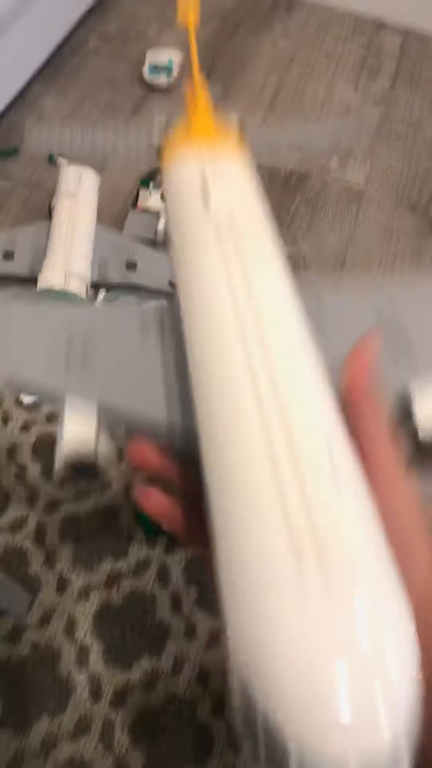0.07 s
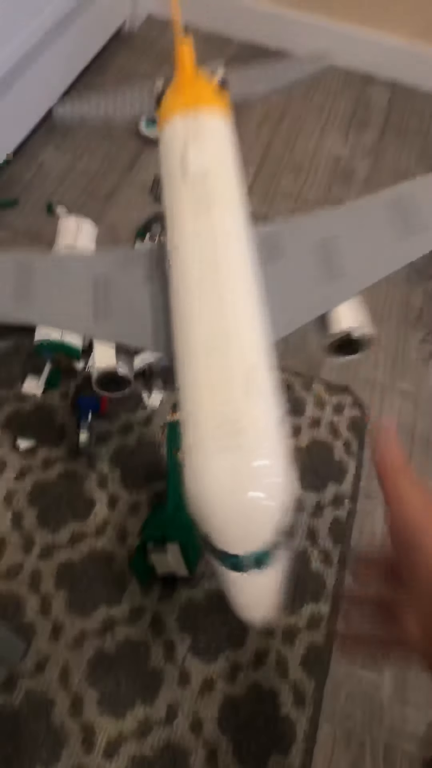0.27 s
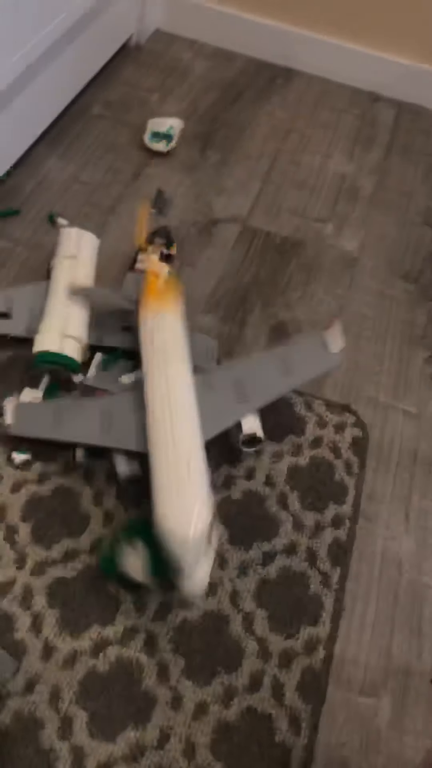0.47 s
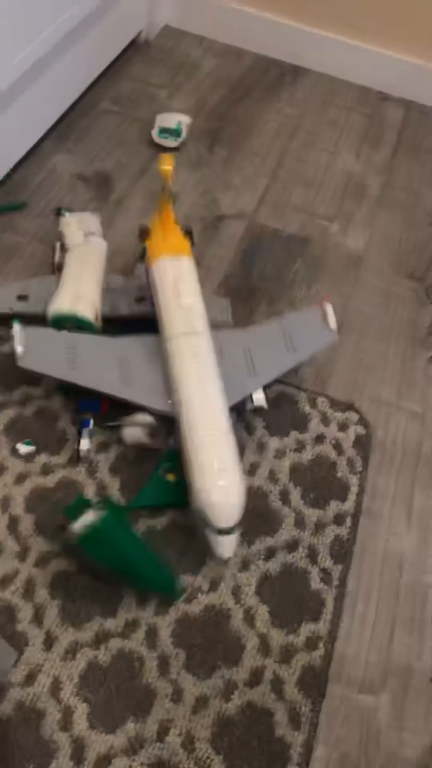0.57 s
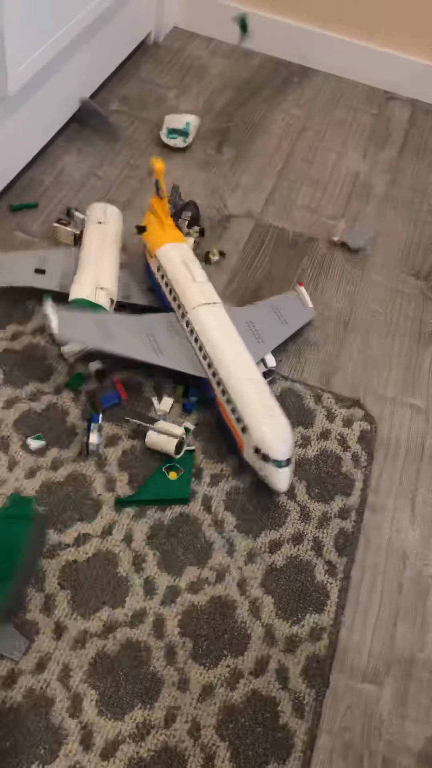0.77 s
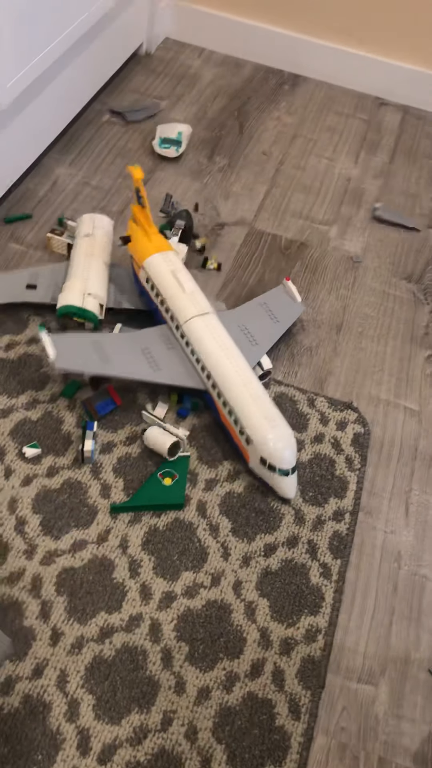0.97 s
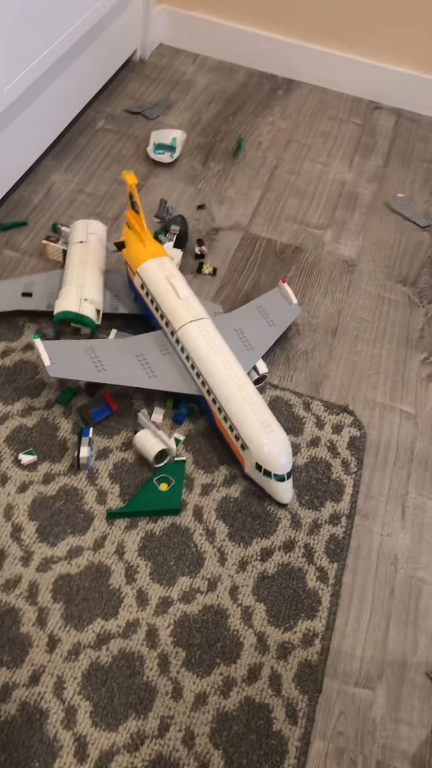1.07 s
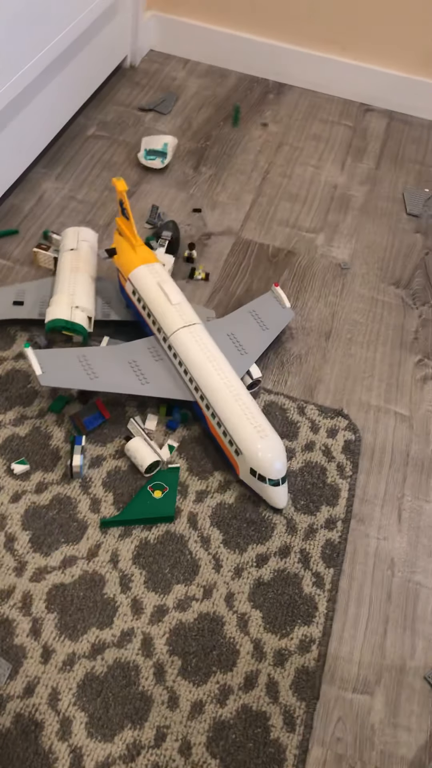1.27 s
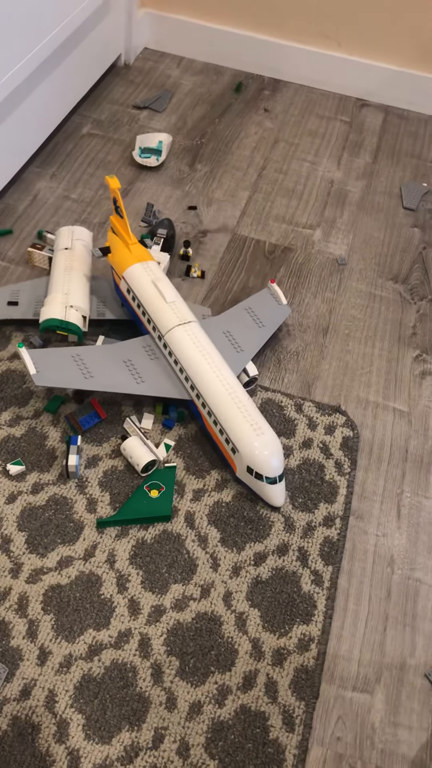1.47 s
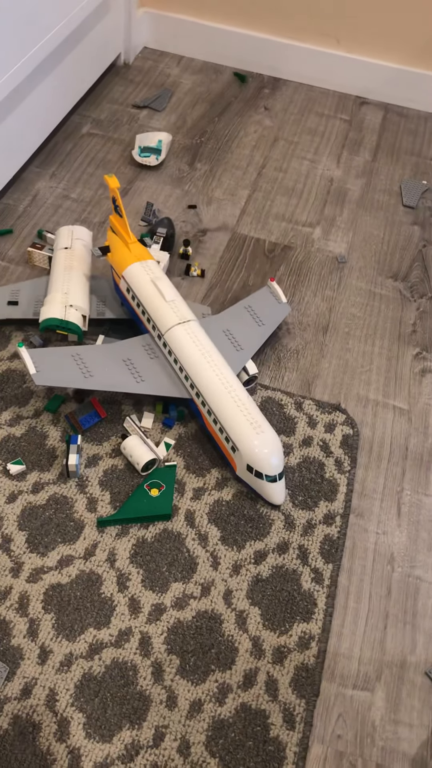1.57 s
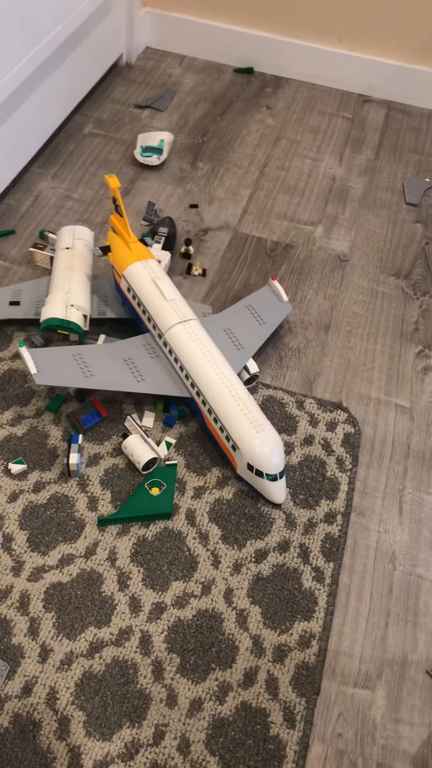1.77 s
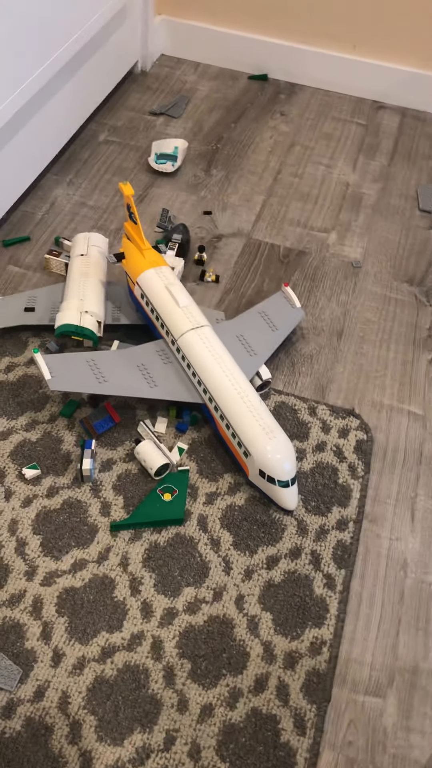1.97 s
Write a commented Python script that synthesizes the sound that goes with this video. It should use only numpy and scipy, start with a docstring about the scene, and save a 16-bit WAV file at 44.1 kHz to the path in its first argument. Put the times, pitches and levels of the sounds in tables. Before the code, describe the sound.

A large plastic brick toy airplane crashes on a plank floor in a small, slightly echoing room. A soft bump and squeaky hand rub run from 0 to 0.4 seconds. At 0.44 the hollow hull cracks loudly, the floor booms, and bricks clatter until about 1.0. A flat plate smacks down at 1.03, bouncing faster beside high tinkles until 1.7; faint dull bumps end it over quiet air.

```python
"""First, quiet room air and a dull bump; then a big toy airplane of plastic bricks rubs and squeaks out of a hand.
It crashes on a plank floor: the hull cracks, the floor booms and loose bricks clatter away.
A flat plate lands hard and bounces to rest beside a small tinkling piece.
Plastic hits are bursts of noise plus ringing sines, the floor is low sines and a knock, the air is filtered noise.
All but the air also echo in a small room."""
import sys
import numpy as np
from scipy import signal
from scipy.io import wavfile

SR = 44100
rng = np.random.default_rng(int(sys.argv[2]) if len(sys.argv) > 2 else 0)


def unload_audio(sound):
    """Save the sound as a 16-bit wav file, at the path given as the first command line argument."""
    columns = np.transpose(np.atleast_2d(sound))
    # keep every value between -1 and 1, then stretch to whole-number steps
    steps = np.round(np.clip(columns, -1, 1) * 32767)
    wavfile.write(sys.argv[1], SR, steps.astype(np.int16))


N = 89302  # length in samples
RING = np.arange(SR // 2) / SR  # time within one hit: half a second


def amp(db):
    """Turns decibels into a gain."""
    return 10 ** (np.asarray(db) / 20)


def unit(x):
    """Scales a sound to energy 1."""
    return x / np.sqrt(np.sum(x ** 2) + 1e-20)


def read(points, hz):
    """Reads between the points of a table, along a log-frequency axis."""
    f, value = np.transpose(points)
    return np.interp(np.log(hz + 1), np.log(f + 1), value)


def add(mix, s, sound):
    """Mixes a sound in at time s [s], cutting what runs past the end."""
    part = mix[round(s * SR):][:len(sound)]
    part += sound[:len(part)]


def colour(x, points, size=2048):
    """Filters a sound to a given spectrum without smearing it back in time (minimum phase)."""
    hz = abs(np.fft.fftfreq(size, 1 / SR))
    log_gain = np.log(amp(read(points, hz)))
    # the Hilbert transform finds the phase that puts the response after time 0
    response = np.exp(np.conj(signal.hilbert(log_gain)))
    taps = np.fft.ifft(response).real
    return signal.fftconvolve(x, taps)[:len(x)]


def dying(t60):
    """A fade that falls 60 dB in t60 seconds."""
    return np.exp(-np.log(1000) * RING / np.maximum(t60, 1e-3))


def ring(modes, detune):
    """A struck object rings at its own pitches, here with random detuning and starting phase."""
    total = np.zeros(len(RING))
    for hz, db, t60 in modes:
        pitch = hz * (1 + detune * rng.normal())
        wave = np.sin(2 * np.pi * (pitch * RING + rng.random()))
        total += amp(db) * dying(t60) * wave
    return unit(total)


def crack(t60, grain_db):
    """A dying burst of noise, made uneven like many tiny contacts."""
    # each random level lasts 20 samples
    grain = np.repeat(rng.standard_normal(len(RING)), 20)[:len(RING)]
    noise = rng.standard_normal(len(RING))
    return unit(noise * amp(grain_db * grain) * dying(t60))


# where a hit's body, crack, fizz and topmost treble levels apply: (frequency [Hz])
BAND_HZ = [1100, 4600, 11500, 15000]


def strikes(rows, modes, spectrum, level_db, ring_db, detune, grain_db):
    """Plastic hits: a crack plus ringing pitches, each hit with its own brightness."""
    out = np.zeros(N)
    for s, *band_db, t60 in rows:
        hit = crack(t60, grain_db) + amp(ring_db) * ring(modes, detune)
        brightness = list(zip(BAND_HZ, band_db))
        add(out, s, colour(hit, brightness))
    return amp(level_db) * colour(out, spectrum)


# Hit and mode levels below are relative: each layer sets its own loudness.

# spectrum of the quiet room air: (frequency [Hz], relative level [dB])
AIR_COLOUR = [(20, -29), (38, -13.5), (55, -4.5), (150, -8), (300, -12.5), (1200, -20), (3000, -24.5),
              (8000, -32.5), (16000, -43.5)]


def room_air(level_db=-62.5):
    """Steady noise, mostly low, with the given average (RMS) level."""
    noise = colour(rng.standard_normal(N), AIR_COLOUR)
    return amp(level_db) * np.sqrt(N) * unit(noise)


# dull handling bumps: (time [s], body level [dB], crack level [dB], fizz level [dB], crack t60 [s])
BUMPS = [(.001, -57.5, -80, -90, 0.089), (.378, -55, -84.5, -99, 0.077), (1.816, -49, -68, -85, 0.043),
         (1.895, -55.5, -62.5, -98, 0.13), (2.016, -43.5, -77, -82.5, 0.057)]
# spectrum of the bumps: (frequency [Hz], relative level [dB])
BUMP_COLOUR = [(40, -9), (160, 1.5), (300, 7.5), (700, 5.5), (1300, -0.5), (3000, -9.5), (16000, -15.5)]
# ringing pitches of the hollow hull: (frequency [Hz], level [dB], t60 [s])
HULL_MODES = [(603, -4.5, 0.17), (768.4, -8, 0.11), (891.4, -0.5, 0.058), (990, -1.5, 0.088),
              (1120, 0.5, 0.056), (1473, -3.5, 0.046), (1685, -2, 0.077), (1930, -2.5, 0.047),
              (2086, -4.5, .06), (2680, 0.5, 0.054)]


def handling_bumps():
    """Dull bumps ring the hull's pitches under mostly low noise."""
    return strikes(BUMPS, HULL_MODES, BUMP_COLOUR, level_db=28.5, ring_db=-18, detune=.01, grain_db=-0.5)


# the hull catching on the hand: (time [s], rub level [dB], squeak level [dB])
SLIPS = [(.092, -46.5, -67), (.108, -49.5, -67.5), (.139, -46.5, -65.5), (.159, -43.5, -61.5),
         (.164, -42.5, -59), (0.194, -48, -66), (.209, -45.5, -52.5), (0.233, -49.5, -57),
         (0.252, -48.5, -56), (.280, -51, -61.5), (.304, -54.5, -65), (.327, -57.5, -49),
         (0.356, -60.5, -51.5), (0.417, -54, -54.5)]
# spectrum of the rubbing: (frequency [Hz], relative level [dB])
RUB_COLOUR = [(100, -32.5), (450, -15.5), (950, 1.5), (1300, 0), (2100, -14.5), (3100, -13), (4100, -14.5),
              (5000, -28.5), (6700, -18.5), (7500, -33), (16000, -35.5)]
# pitches of the squeak: (frequency [Hz], level [dB], t60 [s])
SQUEAK_MODES = [(3320, 0, .05), (3400, -1, .05), (6350, -15, .04), (6780, -13, .05)]


def hand_rub(level_db=22, squeak_level_db=20, slip_t60=.05):
    """The hull slips over the fingers: each catch is a noise burst plus a ringing squeak."""
    out = np.zeros(N)
    for s, rub_db, squeak_db in SLIPS:
        rub = unit(colour(crack(slip_t60, 2), RUB_COLOUR))
        squeak = ring(SQUEAK_MODES, detune=.005)
        add(out, s, amp(rub_db + level_db) * rub + amp(squeak_db + squeak_level_db) * squeak)
    return out


# blows of the hull: (time [s], body level [dB], crack level [dB], fizz level [dB], crack t60 [s])
BLOWS = [(.4368, -13, -9.5, -17, .037), (.4475, -10.5, -21.5, -33, .045), (.473, -21.5, -10, -12, .035),
         (.484, -11, -13, -19, .05), (.490, -19.5, -15.5, -21.5, .03), (.496, -21, -18, -24.5, .06),
         (.513, -24.5, -24, -21.5, .05), (.550, -31, -19, -24, .045), (.590, -24, -21, -27, .05),
         (.598, -31.5, -22.5, -27, .045), (.622, -28, -22.5, -31, .034), (.6725, -17.5, -21, -29, .03),
         (.686, -26.5, -30, -29, .02), (.696, -24.5, -20.5, -25.5, .025), (.7672, -32.5, -26, -32.5, .022),
         (.808, -25, -21, -22, .035), (.812, -26.5, -21, -29, .04), (.821, -31.5, -26, -26.5, .04)]
# spectrum of the hull's contacts: (frequency [Hz], relative level [dB])
HULL_COLOUR = [(25, -29), (100, -6), (250, 3), (430, 1.5), (800, 6.5), (1500, 9.5), (3000, 4.5), (7000, 2),
               (9500, 1), (11000, -1), (16000, -5.5)]


def hull_crash():
    """The hollow hull cracks apart in a run of blows that ring its middle pitches."""
    return strikes(BLOWS, HULL_MODES, HULL_COLOUR, level_db=27, ring_db=-15.5, detune=0.0012, grain_db=1.0)


# weight landing on the floor: (time [s], deep boom level [dB], plank thud level [dB], knock level [dB])
THUMPS = [(.439, -14, -5.5, -10), (.484, -4, -9.5, -15), (0.513, -4, -12.5, -24),
          (.592, -17.5, -10.5, -25.5), (0.691, -50, -20, -19), (0.721, -35, -34, -24.5),
          (0.811, -38.5, -26, -27.5), (0.901, -35, -53.5, -28.5), (.95, -35.5, -42.5, -39),
          (1.01, -27, -35, -29), (1.165, -62, -38, -34.5), (1.272, -40, -37, -36.5),
          (1.43, -54, -47, -43.5), (1.539, -56, -52, -44), (1.681, -48, -57, -63.5),
          (1.89, -48.5, -59.5, -69.5)]
# low pitches of the floor: (frequency [Hz], level [dB], t60 [s])
FLOOR_MODES = [(56.3, -5.5, 0.39), (61, -0.5, 0.27), (88.1, 2, 0.28), (105.1, 2, 0.3), (121.4, -1.5, 0.27),
               (132.4, -3, .12), (200.5, -9.5, 0.15)]
BOOM_HZ, THUD_HZ = 62, 99.8  # where the boom and thud levels apply


def floor_boom(level_db=-10, knock_level_db=18, knock_t60=0.24, knock_hz=380, rise_s=0.002):
    """The planks swell into a boom and knock under each landing."""
    out = np.zeros(N)
    knock_band = signal.butter(2, [110, knock_hz], "band", fs=SR, output="sos")
    swell = 1 - np.exp(-RING / rise_s)
    for s, boom_db, thud_db, knock_db in THUMPS:
        boom = np.zeros(len(RING))
        for hz, db, t60 in FLOOR_MODES:
            landing_db = np.interp(hz, [BOOM_HZ, THUD_HZ], [boom_db, thud_db])
            boom += amp(db + landing_db) * dying(t60) * np.sin(2 * np.pi * hz * RING)
        knock = unit(signal.sosfilt(knock_band, crack(knock_t60, 0)))
        add(out, s, amp(level_db) * boom * swell + amp(knock_db + knock_level_db) * knock)
    return signal.sosfilt(signal.butter(3, 40, "high", fs=SR, output="sos"), out)


# ringing pitches of small bricks: (frequency [Hz], level [dB], t60 [s])
BRICK_MODES = [(3315, -5, 0.18), (4060, -1.5, 0.02), (6006, 2, 0.087), (8220, -11.5, 0.015),
               (12800, -5, .025), (13250, 0, .025)]
# spectrum of the tumbling small bricks: (frequency [Hz], relative level [dB])
SCATTER_COLOUR = [(100, -2), (400, 14), (1000, 22), (2000, 20.5), (4000, 19), (8000, 12.5), (15000, 5.5)]
SCATTER_S, SETTLED_S = 0.44, 1.72  # start and end of the tumbling [s]
SCATTER_DB, SCATTER_FALL_DB_PER_S = -26, 21.5  # starting level before colouring, and its fall
SCATTER_PER_S = 200  # average hits per second, all bricks together


def scatter(count=30):
    """Many small bricks tumble at random moments, ever weaker, until they lie still."""
    t, out = np.arange(N) / SR, np.zeros(N)
    level = amp(SCATTER_DB - SCATTER_FALL_DB_PER_S * (t - SCATTER_S))
    level *= (t > SCATTER_S) * (t < SETTLED_S)
    for _ in range(count):
        # each brick repeats one tick of its own
        hit_now = rng.random(N) < SCATTER_PER_S / count / SR
        hits = hit_now * amp(rng.uniform(-3, 5, N))
        tick = crack(0.00997, 3.5) + 0.64 * ring(BRICK_MODES, 0.15)
        out += signal.fftconvolve(hits * level, tick)[:N]
    return colour(out, SCATTER_COLOUR)


# loose bricks landing: (time [s], body level [dB], crack level [dB], fizz level [dB], crack t60 [s])
BRICKS = [(.492, -14, -15, -17, 0.016), (.519, -32, -33, -18, 0.045), (.613, -44, -31, -29, 0.02),
          (.6615, -44, -34, -13.5, 0.023), (.6645, -40, -24.5, -14, 0.013), (.668, -25, -36, -18.5, 0.039),
          (.834, -22.5, -27, -35, 0.015), (.845, -25.5, -35.5, -38.5, 0.074),
          (.866, -34.5, -24.5, -24, 0.019), (.8725, -33, -37, -30, 0.02), (.9302, -34, -27.5, -25.5, .02),
          (.94, -29.5, -35, -31, 0.01), (.9495, -23, -30, -22, 0.02), (.975, -35.5, -32.5, -37, 0.056),
          (.986, -50, -30, -31.5, 0.032), (1.014, -34.5, -32, -35, 0.053), (1.1395, -38.5, -30, -69, .016)]
# spectrum of the bricks' contacts: (frequency [Hz], relative level [dB])
BRICK_COLOUR = [(40, -35), (150, -12.5), (500, -6), (1100, 2.5), (2500, 3), (6000, 2.5), (9000, 3),
                (10700, -3.5), (13000, 0.5), (14300, -9), (16000, -5)]


def loose_bricks():
    """Single bricks land with short clacks and high ringing pitches."""
    return strikes(BRICKS, BRICK_MODES, BRICK_COLOUR, level_db=28, ring_db=-10, detune=.04, grain_db=0)


# bounces of a flat plate, ever quicker:
# (time [s], body level [dB], crack level [dB], fizz level [dB], topmost treble level [dB], crack t60 [s])
BOUNCES = [(1.0277, -31.5, -22, -11.5, -5, 0.0086), (1.030, -31, -16.5, -10, -25, 0.012),
           (1.2465, -32.5, -27.5, -22, -48, 0.042), (1.354, -31, -26, -31.5, -39, 0.013),
           (1.4305, -42.5, -28.5, -28.5, -50, 0.0091), (1.4885, -34, -34.5, -38, -52, 0.0046),
           (1.497, -44, -35, -32, -60.5, 0.0074), (1.538, -41, -33, -46, -60, 0.0077),
           (1.578, -51, -42.5, -43, -62, 0.0041), (1.6085, -38.5, -45, -74, -73, 0.0054),
           (1.6325, -40.5, -40.5, -54, -60, .014)]
# ringing pitches of the plate: (frequency [Hz], level [dB], t60 [s])
PLATE_MODES = [(2973, -7.5, 0.0605), (4147, -0.5, 0.033), (5666, 1, 0.031), (5730, -5, 0.042),
               (6000, -23, .03), (7900, 0.5, 0.019), (9400, -3, 0.026), (10430, -3.5, .03),
               (14500, -15, .03)]
# spectrum of the plate's contacts: (frequency [Hz], relative level [dB])
PLATE_COLOUR = [(40, -45.5), (150, -27.5), (600, -13.5), (1100, -4), (1700, 3.5), (4000, -1.5), (4900, -1),
                (5650, 2.5), (6500, 1.5), (8000, -1), (9700, 0), (11300, -8), (12400, -5), (13300, 2),
                (14300, -8), (15300, -4), (16000, -12)]


def flat_plate():
    """A flat plate lands hard and bounces to rest, with short bright rings."""
    return strikes(BOUNCES, PLATE_MODES, PLATE_COLOUR, level_db=27, ring_db=-6, detune=0.0036, grain_db=-2)


# bounces of a small bright piece:
# (time [s], body level [dB], crack level [dB], fizz level [dB], topmost treble level [dB], crack t60 [s])
TINKLES = [(1.218, -59, -27, -49, -50, 0.014), (1.250, -28.5, -22, -24.5, -36, 0.016),
           (1.261, -58, -41, -39, -52, 0.012), (1.3075, -47, -41, -28, -38, 0.0083),
           (1.393, -48, -38, -25, -40, .014), (1.456, -36, -45, -27.5, -34, 0.0097),
           (1.525, -53, -45, -38, -42, 0.014), (1.588, -58, -58, -38.5, -47, .012),
           (1.69, -41, -51, -49.5, -63, 0.013)]
# ringing pitches of the small piece: (frequency [Hz], level [dB], t60 [s])
TINKLE_MODES = [(9200, 1, 0.13), (9600, 7.5, 0.074), (9770, 0, 0.15), (10100, -11, .09), (13150, -1, .18),
                (13300, -3, .16), (15400, -3, .05)]
# spectrum of the small piece's contacts: (frequency [Hz], relative level [dB])
TINKLE_COLOUR = [(40, -45), (150, -28), (600, -8), (1100, -4), (1700, 4), (4000, -1), (8600, -0.5),
                 (9300, 6.5), (9900, 3.5), (10300, -6), (11300, -17), (12500, -9), (13300, 3), (14200, -1),
                 (15400, -1), (16000, -9)]


def tinkling_piece():
    """A small piece tinkles as it bounces, ringing at very high pitches."""
    return strikes(TINKLES, TINKLE_MODES, TINKLE_COLOUR, level_db=24.5, ring_db=-8, detune=0.0039, grain_db=4.5)


# how long the room echoes: (frequency [Hz], t60 [s])
ROOM_T60 = [(60, 0.62), (250, 0.71), (700, 0.7), (1800, 0.6), (4600, .45), (9000, 0.31), (15000, 0.25)]


def room(x, wet_db, build_s=0.0047):
    """Direct sound plus dense wall reflections whose treble dies first."""
    hz, t, noise = signal.stft(rng.standard_normal(SR), SR, nperseg=256)
    fade = np.exp(-np.log(1000) * t / read(ROOM_T60, hz)[:, None])
    tail = signal.istft(noise * fade, SR, nperseg=256)[1]
    # the reflections build up over the first few milliseconds
    tail *= np.minimum(np.arange(len(tail)) / SR / build_s, 1)
    return x + amp(wet_db) * signal.fftconvolve(x, unit(tail))[:N]


def scene():
    """The slip, the crash and the scattering pieces over quiet room air."""
    mix = room_air()
    mix += room(hand_rub() + handling_bumps(), wet_db=-2.5)
    mix += room(hull_crash(), wet_db=-4)
    mix += room(floor_boom(), wet_db=-9.5)
    mix += room(scatter(), wet_db=-4.5)
    mix += room(loose_bricks(), wet_db=-2)
    mix += room(flat_plate(), wet_db=-3)
    mix += room(tinkling_piece(), wet_db=-2.5)
    return mix[None]


CUT_HZ = 15850  # top of the treble


def record(dry, ceiling=1.7):
    """The loudest peaks overload softly; then the highest treble is cut off."""
    soft = ceiling * np.tanh(dry / ceiling)
    low_pass = signal.firwin(255, CUT_HZ, window=("kaiser", 9), fs=SR)
    return signal.oaconvolve(soft, low_pass[None], "same")


dry = scene()
out = record(dry)
unload_audio(out)
```